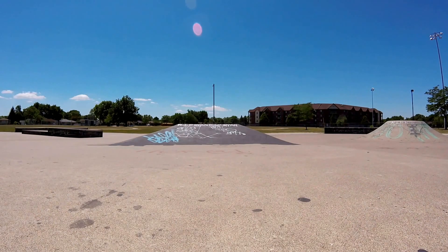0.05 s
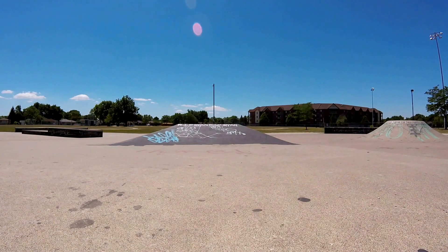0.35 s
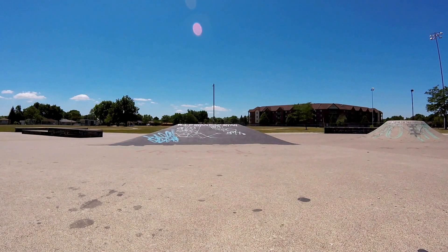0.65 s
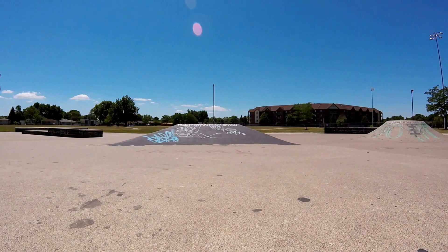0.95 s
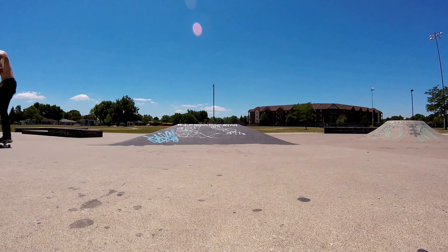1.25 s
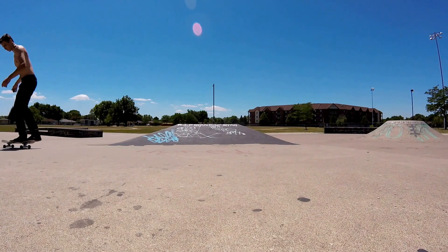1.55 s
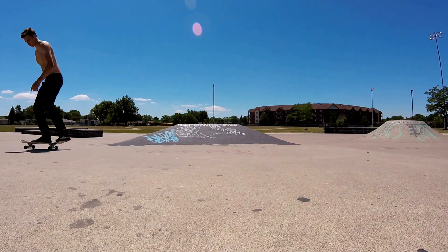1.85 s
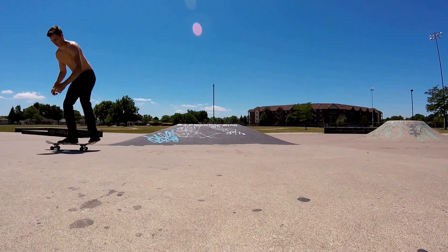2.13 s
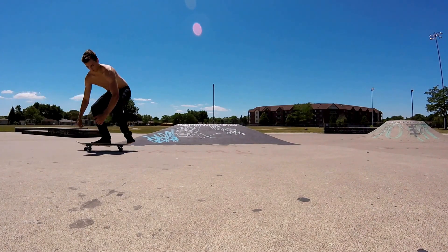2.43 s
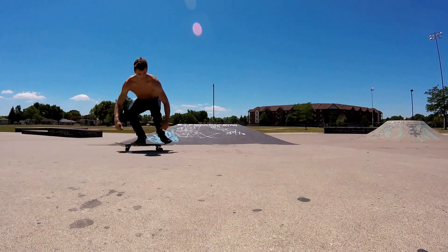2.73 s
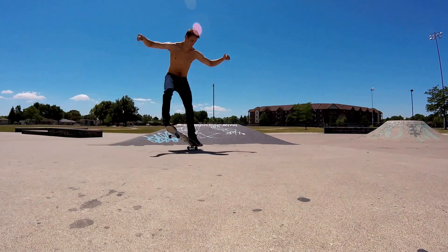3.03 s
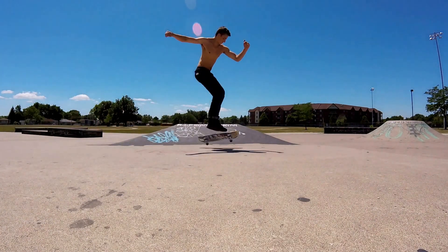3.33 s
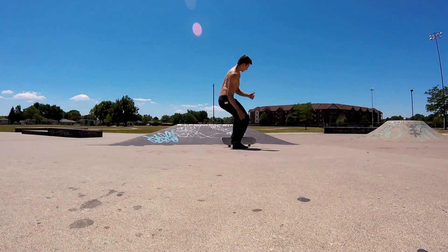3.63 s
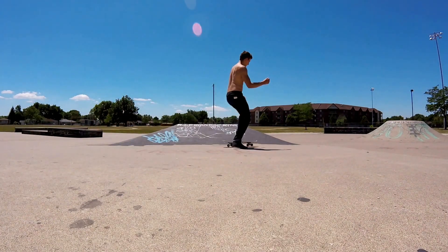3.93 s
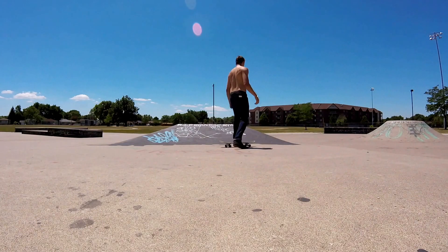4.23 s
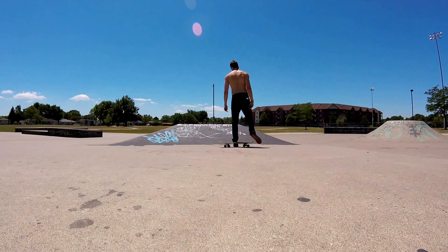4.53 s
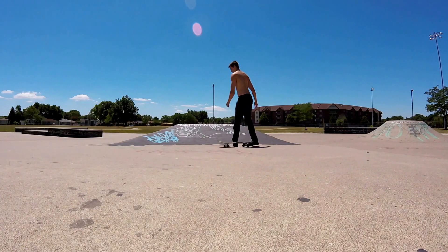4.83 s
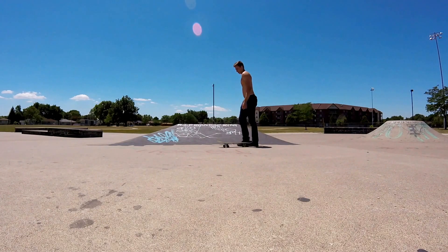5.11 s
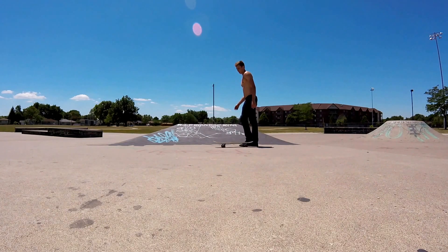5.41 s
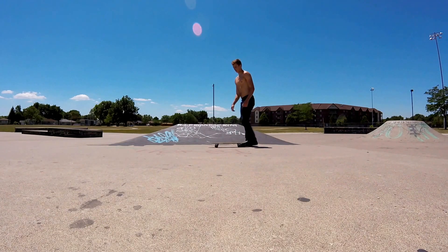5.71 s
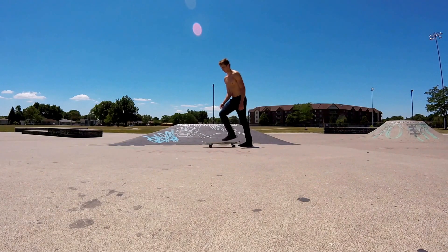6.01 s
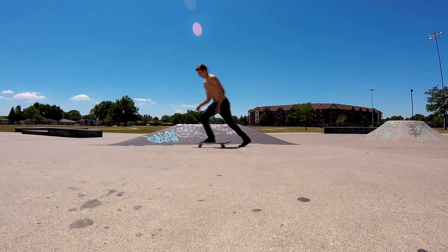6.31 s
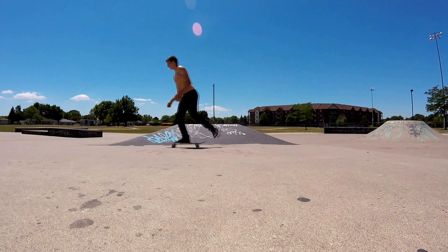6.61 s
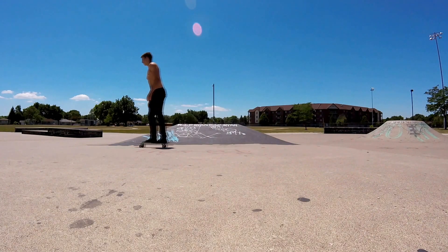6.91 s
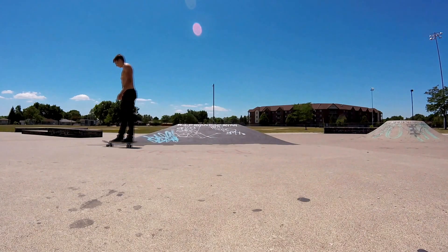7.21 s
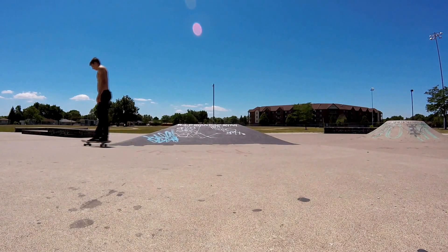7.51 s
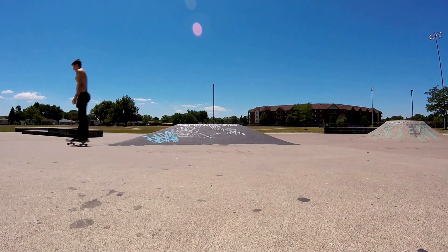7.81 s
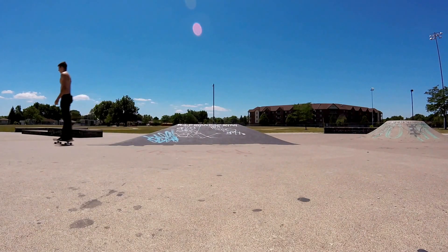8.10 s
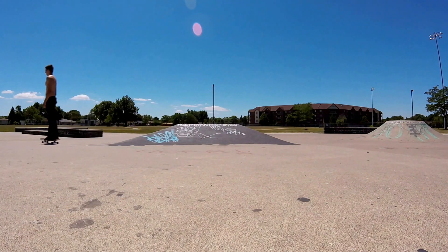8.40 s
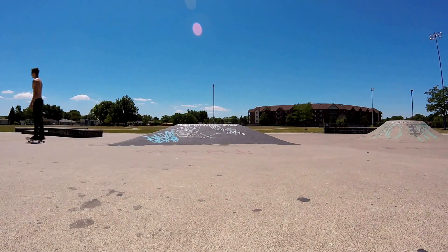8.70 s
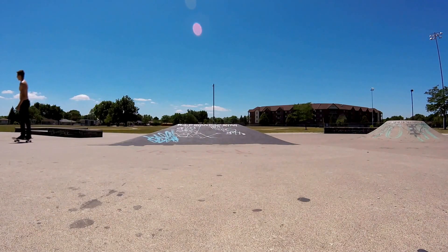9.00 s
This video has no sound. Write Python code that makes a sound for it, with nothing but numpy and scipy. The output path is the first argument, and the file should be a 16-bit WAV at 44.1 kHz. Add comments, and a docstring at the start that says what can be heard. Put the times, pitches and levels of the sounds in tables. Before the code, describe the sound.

A shoe scrapes and judders on concrete in the first half second as a skateboard pushes off. The wheels roll with a rough, hollow rumble that grows louder, while feet knock and scuff on the wooden deck, most sharply at about 1.1 seconds. At 3.1 the roll peaks and the tail pops with a short scrape. The wheels whirr briefly in the air, then land at 3.5 with a loud clatter and thudding shoes. The wheels knock down again at 4, and the deck gives a sharp slap at 4.4. Lighter knocks, soft scuffs and faint rolling follow. Around 6.3 a foot thumps the ground, the rolling picks up, and shoes clack onto the deck near 6.7. The board rolls on steadily, easing slightly until about 9 seconds. The hits carry a thin outdoor echo, over light rumbling wind and faint, steady town noise.

```python
"""In an open concrete skate park, a skateboarder pushes off, rolls past, pops the tail and lands with
a clatter of wheels. He sets the board straight, it clacks down once more, and he pushes away.
Rough concrete drums on the wheels and rumbles through the deck (the wooden board), which rings when hit.
Shoes scuff and catch, and the wheels whirr in the air. Ramps give a thin echo, and a light wind
stirs over distant town noise."""
import sys
import numpy as np
from scipy import signal
from scipy.fft import rfft, irfft
from scipy.io import wavfile

SR = 44100
rng = np.random.default_rng(int(sys.argv[2]) if len(sys.argv) > 2 else 0)


def transcribe(signal):
    """Save signal, clipped to [-1, 1], as a 16-bit WAV file at the path in sys.argv[1]."""
    frames = np.atleast_2d(signal).T
    limited = np.clip(frames, -1, 1)
    pcm = np.round(limited * 32767).astype(np.int16)
    wavfile.write(sys.argv[1], SR, pcm)


N = 403515
T = np.arange(N) / SR
HIT_T = T[:SR // 3]  # the clock for a single hit; all table levels are relative


# tone of the wheels' roar and of the deck's rumble: f/Hz, level/dB
ROAR_TONE = [(200, -19.5), (330, -3), (480, 2.5), (620, 2.5), (830, 1.5), (1000, -9), (1200, -8),
             (1500, -20), (2000, -24.5), (3300, -39), (5000, -35.5), (10000, -54)]
RUMBLE_TONE = [(70, -26.5), (130, -3), (200, 1.5), (290, 3), (400, 2.5), (560, -5), (900, -58.5)]
# stretches of rolling: start/s, end/s, rise/s, fall/s, roar/dB, rumble/dB, change along the way/dB
ROLLS = [(.03, 3.135, 0.53, .03, -35.5, -39.5, -3.8), (3.51, 3.8, .012, 0.22, -41, -47, -2.5),
         (4.02, 4.36, .02, 0.22, -44, -48.5, -7), (4.59, 4.68, 0.14, 0.3, -44, -42, 6),
         (5.04, 5.11, 0.083, 0.13, -45, -50, -6), (5.28, 6.2, 0.22, 0.33, -50.5, -52, -7),
         (6.48, 6.7, 0.35, 0.43, -42, -44.5, -5), (7.0, 9.24, .7, .1, -36.7, -44, -5.5)]
# the rider presses down or lifts his weight: t/s, half width/s, roar/dB, rumble/dB
LEANS = [(.62, 0.056, 4.5, 4.5), (.94, 0.098, 3.5, -1.5), (1.63, 0.23, 0, 4.5), (2.13, 0.035, -9, -7),
         (2.66, 0.24, 3.5, 5.5), (2.95, 0.12, -3.5, -25), (3.085, 0.053, 11.5, 5), (8.601, 0.13, 3, 1.5)]

def rolling():
    """Tiny bumps in the concrete drum on the wheels and shake the deck, louder under more weight."""
    roar = colour(grains(rate=5000, spread_db=2.0), ROAR_TONE) * undb(3.4 * walk(24))
    rumble = colour(grains(rate=4000, spread_db=3.5), RUMBLE_TONE) * undb(0.37 * walk(26))
    # the loaded deck bounces on its trucks, the metal axle mounts
    drone = resonate(rng.standard_normal(N), hz=147 * np.exp(0.11 * walk(4)), width_hz=74)
    axles = (axle(pitch=1.081) + axle(pitch=0.919)) / np.sqrt(2)
    wheels = undb(-5.0) * (unit(roar) + axles) + undb(-11) * unit(drone)
    patches = undb(0.12 * walk(6.3))  # rougher and smoother ground
    load_db = sum(np.outer([roar_db, rumble_db], bell(s, width))
                  for s, width, roar_db, rumble_db in LEANS)
    roar_gain, rumble_gain = strokes(ROLLS, follows=0.15) * undb(load_db) * patches
    return wheels * roar_gain + undb(-5.0) * unit(rumble) * rumble_gain


# hollow note of the loaded wheels: t/s, f/Hz, level/dB
HOLLOW_NOTE = [(0, 890, -25), (1.0, 850, -20), (2.0, 690, -2), (2.6, 643, 0.5), (2.9, 625, 4.5),
               (3.08, 524, 0.5), (4.1, 623, -8), (5.2, 785, -18), (6.5, 593, -3), (7.1, 819, -1.5),
               (7.6, 759, -3), (8.3, 748, 0), (9.15, 707, -5)]

def axle(pitch):
    """One pair of wheels sings a hollow note that wavers and chatters as the weight shifts."""
    s, hz, db = np.transpose(HOLLOW_NOTE)
    centre_hz = pitch * np.interp(T, s, hz) * np.exp(0.032 * walk(6))
    note = resonate(rng.standard_normal(N), centre_hz, width_hz=95)
    chatter = undb(1.7 * walk(22))
    return unit(note * chatter) * undb(np.interp(T, s, db))


# wheels hit the ground: t/s, knock/dB, deck bending/dB, grit/dB, pitch factor, ring time factor
LANDINGS = [(3.1242, -33, -31, -58, 1.24, 0.92), (3.487, -20.5, -23, -43.5, 1.02, 0.79),
            (3.4936, -11, -21.5, -39, 0.93, 0.56), (3.5229, -17, -31, -41, 1.08, 1),
            (3.5702, -21.5, -31, -42.5, 1.38, 1.04), (3.6066, -25.5, -32.5, -59, 0.98, 1.3),
            (3.613, -30.5, -25, -53, 1.06, 0.42), (3.652, -40, -54, -79, 1.3, 0.59),
            (4.005, -16, -54, -42.5, 1.08, 1.17), (4.0565, -34, -51, -49, 1.3, 1.5),
            (4.077, -36.5, -59, -53, 1.1, 2), (4.1259, -47, -49, -60, 1.5, 0.8),
            (4.1311, -29.5, -54, -50.5, 1.09, 1.9), (4.1689, -40, -55, -59, 1.15, 1.7)]
# notes of a struck wheel and of the bending deck: f/Hz, level/dB, ring time/s
WHEEL_NOTES = [(525, 3.5, 0.026), (638, 5, 0.022), (618, -10.5, 0.072), (750, -5, 0.024),
               (866, -13.5, 0.059), (955, -3.5, 0.024), (1200, -15.5, 0.021)]
FLEX_NOTES = [(113, -13, 0.072), (174.6, 0, 0.065), (289.5, 7, 0.052)]
# tone of grit being crushed and of grit snapping: f/Hz, level/dB
CRUSH_TONE = [(1200, -7), (2200, 10), (3200, 1), (3900, 1.5), (5500, 1), (7000, -3.5), (9000, -24),
              (13000, -29)]
SNAP_TONE = [(800, 1), (1700, 7), (3000, 6), (4200, -15), (7000, -4.5), (9500, -21), (14000, -26)]

def landings():
    """Hard plastic wheels knock hollowly, the deck bends under the rider and grit is crushed."""
    out = np.zeros(N)
    for s, knock_db, flex_db, grit_db, pitch, length in LANDINGS:
        knock = soften(ring(WHEEL_NOTES, pitch, length, scatter_db=1.0), contact_ms=0.74)
        add(out, s, undb(knock_db) * (knock + undb(-11.5) * hit_noise(ROAR_TONE, 0.044, -3, 0.097)))
        add(out, s, undb(flex_db) * ring(FLEX_NOTES, pitch, length, scatter_db=7.0))
        add(out, s, undb(grit_db - 5.5) * hit_noise(CRUSH_TONE, 0.029, -9, 0.11))
        # grit snaps a moment later, as the wheel presses down
        add(out, s + 0.00123, undb(grit_db - 2) * hit_noise(SNAP_TONE, 0.0044, -18, 0.05))
    return out


# feet knock on the deck: t/s, wood/dB, deck bending/dB, rasp/dB, pitch factor, contact/ms
CLACKS = [(0.651, -36.5, -43, -47, 1.3, 0.4), (.838, -36, -54, -47, 0.85, 1),
          (1.1117, -20, -29.5, -31.5, 1.19, 0.45), (1.1152, -35, -29, -32.5, 1.03, 0.37),
          (1.262, -37, -42, -39, 1.05, 0.44), (1.321, -30.5, -36, -36, 1.07, 0.57),
          (1.405, -43, -47, -42.5, 1.46, 0.37), (1.482, -31.5, -42, -50, 0.92, 0.41),
          (1.506, -30.5, -29, -42.5, 1, 0.52), (1.779, -54, -32, -57, 1.2, 1.1),
          (2.233, -30, -39, -44, 0.87, 0.34), (3.145, -24.5, -27.5, -40, 1, 0.37),
          (4.6035, -26.5, -34, -44, 1.1, 0.66), (4.682, -35, -34.5, -47, 1.16, 1.2),
          (4.729, -35.5, -40, -46.5, 1.18, 1.57), (4.782, -34, -50, -50, 0.71, 0.29),
          (6.594, -37.5, -44, -61, 1.4, 0.63), (6.722, -28.5, -35, -41.5, 0.8, 0.85),
          (6.728, -30.5, -38, -48, 0.83, 0.77), (6.735, -28, -44, -56, 0.76, 0.51),
          (6.751, -39, -42, -52, 1.26, 0.6), (6.88, -34, -44, -51, 0.9, 0.5),
          (6.901, -36.5, -43, -44, 0.92, 0.41)]
# notes of the wooden deck: f/Hz, level/dB, ring time/s
DECK_NOTES = [(376, -8, 0.08), (430.5, -1.5, 0.066), (525, -6, 0.022), (653, -3, 0.091), (808, 4.5, 0.026),
              (929, -6.5, 0.095), (1157, -3.5, 0.027), (1320, -20, 0.065), (1670, -28, 0.05)]

def clacks():
    """Rubber soles set the maple deck ringing and rasp on its sandpapery grip tape."""
    out = np.zeros(N)
    for s, wood_db, flex_db, rasp_db, pitch, contact_ms in CLACKS:
        notes = ring(DECK_NOTES, pitch, 1, scatter_db=3)
        wood = notes + undb(-1.0) * hit_noise(ROAR_TONE, 0.068, -5, 0.11)
        flex = ring(FLEX_NOTES, pitch, 0.99, scatter_db=5)
        add(out, s, undb(wood_db) * soften(wood, contact_ms))
        add(out, s, undb(flex_db) * soften(flex, contact_ms))
        add(out, s, undb(rasp_db) * rasp())
    return out


# the bare end of the deck hits something hard: t/s, wood/dB, crack/dB, pitch factor
SLAPS = [(0.8375, -35.5, -48, 0.89), (.8405, -37, -52, 1.02), (3.1452, -31, -50, 0.74),
         (3.154, -35, -55, 0.9), (3.159, -32, -56, 0.9), (3.1715, -35, -51, 0.9), (3.186, -35, -48, 0.9),
         (3.1945, -37, -48, 0.9), (4.3343, -44, -65, 0.72), (4.4143, -17.5, -25.5, 1.0),
         (4.4282, -46, -44, 0.92), (4.474, -44, -60, 0.77), (4.508, -41.5, -61, 0.95)]
# the deck's higher notes: f/Hz, level/dB, ring time/s
SLAP_NOTES = [(431, -7, 0.12), (521, -6, 0.13), (773, 2.5, 0.07), (916, -5, 0.1), (1058, 4.5, 0.041),
              (1280, 7.5, 0.035), (1405, -0.5, 0.025), (1690, -10.5, 0.05), (1955, -9.5, 0.045),
              (2240, -4.5, 0.027), (3330, -11, 0.04), (3930, -9.5, 0.024)]
# tone of the trucks' clatter and of the dry crack: f/Hz, level/dB
CLATTER_TONE = [(150, -41), (330, 8), (800, 10.5), (1350, 3), (1650, -28), (2300, -2.5), (3400, -25),
                (4400, -19.5), (12000, -49)]
CRACK_TONE = [(700, -10), (1350, 4), (2100, 0), (2600, 3.5), (3250, 2), (3600, -11), (3950, -3),
              (4350, -18), (5800, -29), (6800, -20), (9000, -42), (14000, -57)]

def slaps():
    """A hard hit makes the deck ring high under a dry crack, and the trucks clatter."""
    out = np.zeros(N)
    for s, wood_db, crack_db, pitch in SLAPS:
        clatter = undb(-9.5) * hit_noise(CLATTER_TONE, 0.072, -17, 0.13)
        add(out, s, undb(wood_db) * (ring(SLAP_NOTES, pitch, 0.98, scatter_db=0.5) + clatter))
        add(out, s, undb(crack_db) * hit_noise(CRACK_TONE, 0.0055, -21, 0.056))
    return out


# tone of the board's tail scraping the ground: f/Hz, level/dB
TAIL_TONE = [(120, -25), (250, 13), (330, 0), (470, -3), (650, 5.5), (900, 11), (1350, -14), (1800, -36),
             (3400, -22), (6000, -75)]

def pop():
    """To start the jump, the tail grazes the concrete, bites hard and leaves the ground."""
    s, hold_s, rise_s, fall_s = 3.148, 0.045, 0.0071, 0.0061
    graze = (s - rise_s, s, 0.19, fall_s, -33.5, -55.5, 0)  # same columns as PUSH_DRAGS
    bite = (s, s + hold_s, rise_s, fall_s, -28.5, -46, -6)
    return scrape([graze, bite], TAIL_TONE, slip_db=2.0, rasp_db=3.5, grit_db=7.0)


# the rider's weight comes down: t/s, level/dB, f/Hz
THUDS = [(3.486, -28.5, 168), (3.568, -27.5, 115), (3.584, -29, 74.4), (3.611, -32, 104),
         (3.9975, -25, 113), (4.041, -38, 100), (4.125, -37, 118), (4.38, -34, 437), (4.384, -41, 109),
         (6.393, -38, 143), (6.423, -32, 60)]

def thuds():
    """Shoes land softly and heavily: a low note that dies away in five swings."""
    out = np.zeros(N)
    for s, db, hz in THUDS:
        add(out, s, undb(db) * burst(fade(5 / hz) * np.sin(2 * np.pi * hz * HIT_T)))
    return out


# half turns of the board in the air: t/s, half width/s, level/dB, f/Hz
HALF_TURNS = [(3.29, 0.032, -36.5, 1030), (3.399, 0.042, -35.5, 784)]

def spin():
    """Free wheels whirr in their bearings; with each half turn the whirr swells and falls in pitch."""
    whirr_tone = [(300, 20.0), (600, 17.0), (850, 31.0), (1150, 20.0),  # f/Hz, level/dB
                  (1600, -2), (3000, -15), (8000, -50)]
    rush = undb(-3) * unit(colour(rng.standard_normal(N), whirr_tone))
    out = np.zeros(N)
    for s, width, db, hz in HALF_TURNS:
        glide_hz = hz * 2 ** np.clip(2.5 * (s - T), -1, 1)  # down 2.5 octaves a second
        note = unit(resonate(rng.standard_normal(N), glide_hz, width_hz=370))
        out += undb(db) * bell(s, width) * (rush + note)
    return out


# a sole drags: start/s, end/s, rise/s, fall/s, rasp/dB, grit/dB, change along the way/dB
PUSH_DRAGS = [(.09, .2, 0.075, 0.031, -43, -63.5, 10), (.245, .285, 0.048, 0.13, -33.5, -56, -6.5),
              (.345, .37, 0.069, 0.097, -41, -55, -7)]
# mid-pitched tone of the dragging sole: f/Hz, level/dB
PUSH_TONE = [(350, -37), (600, -16), (820, 17.5), (1150, 15), (1400, 5.5), (1750, 4.5), (2200, -7),
             (3500, -34), (6000, -58)]

def push_off():
    """A sole drags over the concrete in the first push."""
    return scrape(PUSH_DRAGS, PUSH_TONE, slip_db=1.5, rasp_db=1.0, grit_db=4.0)


# tone of crackling grit: f/Hz, level/dB
GRIT_TONE = [(600, -17), (1400, 16), (2800, 1.5), (3350, 5.5), (3800, 0), (6000, -0.5), (8500, -11),
             (11000, -17), (14000, -62)]

def scrape(drags, tone, slip_db, rasp_db, grit_db):
    """Dragging over concrete makes crowds of tiny slips that come in fits, with sand crackling."""
    fits = undb(slip_db * walk(110))
    slips = grains(rate=3000, spread_db=2) * fits
    sand = grains(rate=5000, spread_db=4) * fits
    rasp_gain, grit_gain = strokes(drags, follows=0.89)
    return (undb(rasp_db) * unit(colour(slips, tone)) * rasp_gain
            + undb(grit_db) * unit(colour(sand, GRIT_TONE)) * grit_gain)


# a sole judders as the first push ends: t/s, slip rate/Hz, level/dB
JUDDER = [(.315, 420, -45), (0.346, 417, -32.5), (.362, 423, -29.5), (0.385, 474, -38.5), (.408, 390, -37),
          (.435, 420, -71)]
# tone of juddering rubber: f/Hz, level/dB
JUDDER_TONE = [(200, -10), (400, -2), (830, 1.5), (1250, 0.5), (1700, -9), (2100, -15), (2500, -23),
               (2900, -27), (4200, -29), (9000, -55)]

def judder():
    """Rubber grips and slips almost regularly, which makes a short, rough note."""
    s, hz, db = np.transpose(JUDDER)
    slip_hz = np.interp(T, s, hz) * (1 + 0.045 * walk(300))
    cycles = np.cumsum(slip_hz) / SR
    slips = np.diff(np.floor(cycles), prepend=0) * undb(3.1 * walk(400))  # one click a cycle
    gain = undb(np.interp(T, s, db, left=-np.inf, right=-np.inf))
    return unit(colour(slips - slips.mean(), JUDDER_TONE)) * gain


# a sole catches on the concrete: t/s, tick/dB, rasp/dB, pitch factor
CATCHES = [(.077, -37, -52, 1.3), (.094, -37, -38.5, 1.03), (0.1216, -35.5, -47, 1.02),
           (.139, -36, -52, 0.93), (0.1511, -34.5, -34, 1.27), (.166, -32, -45, 1.05),
           (.179, -35, -50, 1.2), (.189, -29, -40, 1.12), (.194, -30.5, -41, 0.96), (0.201, -37, -54, 1.0),
           (.242, -37, -43, 0.83), (.27, -35, -41, 0.73), (5.026, -43.5, -65, 1.0), (5.262, -44, -64, .94),
           (5.309, -42, -48.5, 1.02), (5.384, -47, -68, 0.92), (5.411, -49, -51.5, 1.14),
           (5.588, -45, -67, 0.82), (6.293, -48, -69, 0.83), (6.591, -38.5, -38.5, 1.1)]
# notes in the tick: f/Hz, level/dB, ring time/s
TICK_NOTES = [(795, 8, 0.036), (970, 0.5, 0.055), (1107, -2, 0.021), (1347, -7.5, 0.026)]

def catches():
    """The sole grips the ground and lets go with a gritty, ringing tick."""
    out = np.zeros(N)
    for s, tick_db, rasp_db, pitch in CATCHES:
        tick = ring(TICK_NOTES, pitch, 1, scatter_db=4.0)
        add(out, s, undb(tick_db) * tick + undb(rasp_db) * rasp())
    return out


# tone of rasping rubber: f/Hz, level/dB
RASP_TONE = [(600, 0.5), (1200, 5), (1850, 1.5), (2300, -8.5), (2750, -18), (4000, -27), (6500, -31),
             (14000, -60)]

def rasp():
    """Rubber drags for a moment: the noise swells, dies quickly and trails off."""
    pressure = (1 - fade(0.0081)) * (fade(0.021) + undb(-13.5) * fade(0.25))
    return burst(colour(rng.standard_normal(len(HIT_T)) * pressure, RASP_TONE))


# short scuffs on grip tape or concrete: t/s, rub/dB, sand/dB, length/s
SCUFFS = [(1.32, -38, -59, 0.14), (1.498, -29.5, -53, 0.17), (1.705, -29.5, -52, 0.079),
          (1.802, -37, -59, 0.13), (2.194, -37.5, -59, 0.16), (2.224, -49, -57, 0.14),
          (2.441, -60, -53, 0.079), (2.504, -43, -57, 0.13), (4.604, -37, -61, 0.24),
          (4.883, -41.5, -60, 0.055), (5.002, -44, -55, 0.097), (5.062, -49, -71, 0.07),
          (5.246, -40, -57.5, 0.1), (5.307, -34.5, -48.5, 0.047), (5.406, -40, -56, 0.025),
          (5.545, -42.5, -62, 0.14), (5.6, -39, -56, 0.023), (6.289, -44, -69, 0.099),
          (6.708, -37, -56, 0.12), (6.92, -35, -58, 0.1), (6.98, -36, -59, 0.03)]
# tone of the rubbing sole and of the sand under it: f/Hz, level/dB
RUB_TONE = [(250, -19), (550, 5.5), (800, 8), (1300, -2), (1550, -13), (2500, -16), (5000, -49)]
SAND_TONE = [(900, 0), (1700, 6), (3000, 9), (5000, 3.5), (7500, 0), (10500, -9), (14000, -36)]

def scuffs():
    """Soles shift and drag briefly: a dull rub with sand hissing above it."""
    rub_gain, sand_gain = np.zeros(N), np.zeros(N)
    for s, rub_db, sand_db, length in SCUFFS:
        pressure = (1 - fade(0.22 * length)) * fade(2 * length)  # longer scuffs start more gently
        add(rub_gain, s, undb(rub_db) * pressure)
        add(sand_gain, s, undb(sand_db) * pressure)
    return (rub_gain * unit(colour(grains(rate=1700, spread_db=2.0), RUB_TONE))
            + sand_gain * unit(colour(grains(rate=5000, spread_db=4.5), SAND_TONE)))


# light touches of a shoe: t/s, half width/s, level/dB
BRUSHES = [(.813, 0.0084, -53.5), (.84, 0.0033, -47), (2.25, .04, -69), (6.728, 0.019, -57)]
# tone of brushed grip tape: f/Hz, level/dB
BRUSH_TONE = [(1500, -20), (3200, 4), (3900, -5), (4600, -2), (5500, 4), (6500, -17), (11000, -20.5),
              (14000, -45)]

def brushes():
    """Grip tape hisses thinly under a light shoe."""
    hiss = unit(colour(grains(rate=7200, spread_db=1.5), BRUSH_TONE))
    return hiss * sum(undb(db) * bell(s, width) for s, width, db in BRUSHES)


def late_swell():
    """Near the end a faint, grainy mid-pitched noise swells and stays."""
    swell_s, rise_s = 8.68, 0.48
    gain = undb(-52.5 - 20 * np.maximum(swell_s - T, 0) / rise_s)
    return unit(colour(grains(rate=2000, spread_db=0.5), PUSH_TONE)) * gain


# tone of the park's echo: f/Hz, level/dB
ECHO_TONE = [(100, -9.5), (300, -2.5), (700, -6.5), (1400, -4.5), (3000, -17.5), (10000, -2.5)]

def park_echo(x, wet_db, t60):
    """Ramps and ledges scatter a thin echo that dies away in t60 seconds."""
    t = T[:SR]
    shape = np.exp(-np.log(1000) * t / t60) * (1 - np.exp(-t / 0.0066))
    tail = colour(rng.standard_normal(SR) * shape, ECHO_TONE)
    return undb(wet_db) * signal.fftconvolve(x, tail / np.sqrt(np.sum(tail ** 2)))[:N]


# tone of the wind: f/Hz, level/dB
WIND_TONE = [(8.8, -20), (15, 4), (41, 3.5), (96, -7), (170, -10.5), (220, -38), (370, -120)]

def wind():
    """Light gusts of wind buffet with a deep, fluttering rumble."""
    flutter = colour(rng.standard_normal(N), WIND_TONE, size=16384) * undb(2.1 * walk(9.8))
    return unit(flutter) * undb(-40.5 + 1.5 * walk(4.4))


# tone of the distant town: f/Hz, level/dB
TOWN_TONE = [(65, -55.5), (110, -5.5), (152, -8.5), (194, -7.5), (228, -5), (274, -9), (309, -37.5),
             (544, -18), (903, -15), (1530, -29.5), (1730, -29), (3040, -31.5), (3580, -33), (11800, -48.5),
             (13900, -103)]

def town():
    """The far-off town blurs into an almost steady noise."""
    return unit(colour(rng.standard_normal(N), TOWN_TONE)) * undb(-52 + 0.093 * walk(2.7))


def ring(notes, pitch, length, scatter_db):
    """A struck object rings with several fading notes; each hit finds another spot, so their mix varies."""
    spot = undb(scatter_db * rng.standard_normal(len(notes)))
    # neighbouring notes start by swinging opposite ways
    return burst(sum((-1) ** k * spot[k] * undb(db) * fade(t60 * length)
                     * np.sin(2 * np.pi * hz * pitch * HIT_T) for k, (hz, db, t60) in enumerate(notes)))


def hit_noise(tone, t60, rattle_db, rattle_t60):
    """The sharp noise of a hit, followed by a short rattle of the trucks."""
    shape = fade(t60) + undb(rattle_db) * fade(rattle_t60)
    return burst(colour(rng.standard_normal(len(HIT_T)) * shape, tone))


def soften(x, contact_ms):
    """A longer contact spreads the push and makes the hit duller."""
    push = np.sin(np.pi * np.minimum(1e3 * HIT_T[:256] / max(contact_ms, .1), 1)) ** 2
    return burst(np.convolve(x, push)[:len(x)])


def grains(rate, spread_db):
    """Random tiny hits, about rate a second, a few much larger than the rest."""
    hit = rng.random(N) < rate / SR
    return unit(hit * rng.standard_normal(N) * undb(spread_db * np.minimum(rng.exponential(size=N), 4)))


def colour(x, tone, size=4096):
    """Filter x so that each frequency gets the level given in a tone table."""
    hz, db = np.transpose(tone)
    f = np.maximum(np.fft.rfftfreq(size, 1 / SR), 1)
    cepstrum = irfft(np.log(undb(np.interp(np.log(f), np.log(hz), db))))
    # folding this in half keeps the filter from sounding before a hit
    cepstrum[1:size // 2] *= 2
    cepstrum[size // 2 + 1:] = 0
    return signal.fftconvolve(x, irfft(np.exp(rfft(cepstrum))))[:len(x)]


def resonate(x, hz, width_hz):
    """Keep only a narrow band of x around a moving frequency."""
    turn = np.exp(2j * np.pi * np.cumsum(hz) / SR)
    lowpass = signal.butter(2, width_hz / 2, fs=SR, output="sos")
    return np.real(turn * signal.sosfilt(lowpass, x / turn))


def strokes(rows, follows):
    """Two volume curves from rows like ROLLS; follows is the second one's share of the change."""
    return sum(np.array([undb(first_db) * envelope(*timing, change_db),
                         undb(second_db) * envelope(*timing, follows * change_db)])
               for *timing, first_db, second_db, change_db in rows)


def envelope(start, end, rise_s, fall_s, change_db):
    """Volume rises, slopes from start to end, then falls; rise_s and fall_s are the times for 20 dB."""
    before = np.maximum(start - T, 0) / max(rise_s, 1e-3)
    after = np.maximum(T - end, 0) / max(fall_s, 1e-3)
    return undb(np.interp(T, [start, end], [0, change_db]) - 20 * np.minimum(before + after, 10))


def bell(s, half_width_s):
    """A smooth rise and fall around time s."""
    return np.exp(-np.minimum(((T - s) / half_width_s) ** 2, 20))


def fade(t60):
    """One hit dying away, by 60 dB in t60 seconds."""
    return np.exp(-np.log(1000) * HIT_T / max(t60, 1e-3))


def walk(rate):
    """Drift to a new random value, of size near 1, rate times a second."""
    step = max(int(SR / rate), 1)
    return np.interp(np.arange(N) / step, np.arange(4096), rng.standard_normal(4096))


def undb(db):
    """Turn decibels into a volume factor."""
    return np.exp(np.asarray(db) * (np.log(10) / 20))


def unit(x):
    """Scale to an average strength (rms) of 1."""
    return x / np.sqrt(np.mean(x ** 2))


def burst(x):
    """Give a short sound the energy of 20 ms at strength 1."""
    return x / np.sqrt(np.sum(x ** 2) / (.02 * SR))


def add(out, s, x):
    """Mix x in at time s."""
    i = int(s * SR)
    out[i:i + len(x)] += x[:N - i]


def scene():
    """The board and the shoes with their echo, over town and wind."""
    direct = (landings() + clacks() + catches() + slaps() + thuds() + rolling() + late_swell()
              + scuffs() + brushes() + judder() + pop() + spin() + push_off())
    return (direct + park_echo(direct, wet_db=-15.0, t60=0.5) + town() + wind())[None]


def record(dry):
    """Clip peaks at full scale and cut the treble above 14000 Hz."""
    lowpass = signal.ellip(8, .2, 70, 14000, fs=SR, output="sos")
    return signal.sosfilt(lowpass, np.clip(dry, -1, 1))


dry = scene()
out = record(dry)
transcribe(out)
```